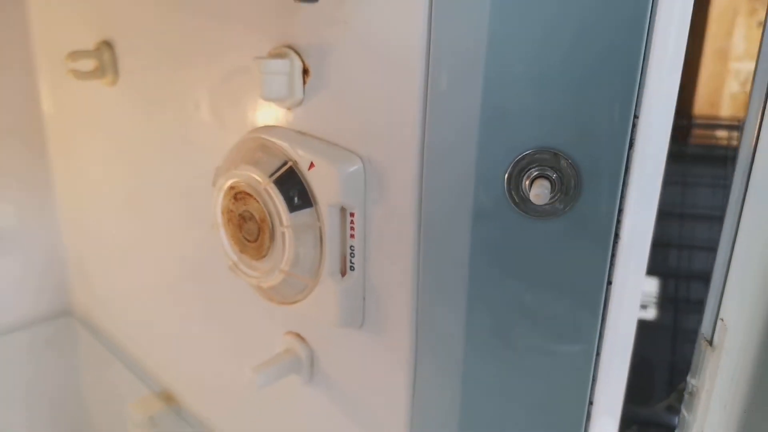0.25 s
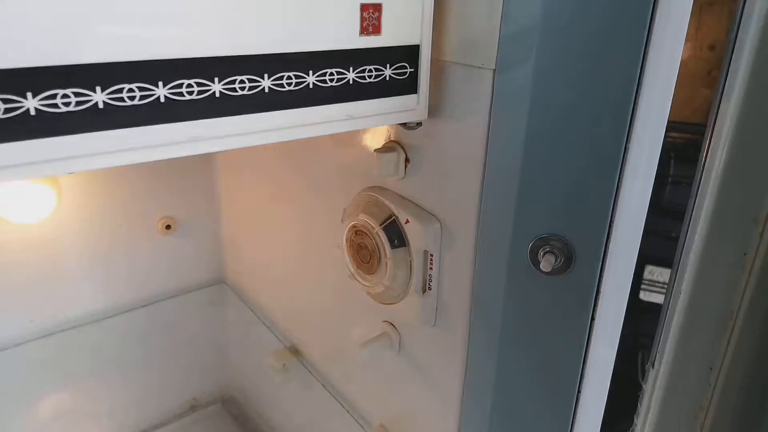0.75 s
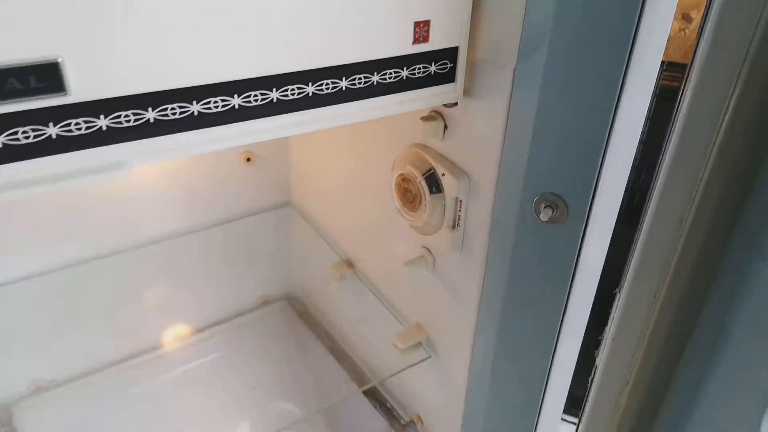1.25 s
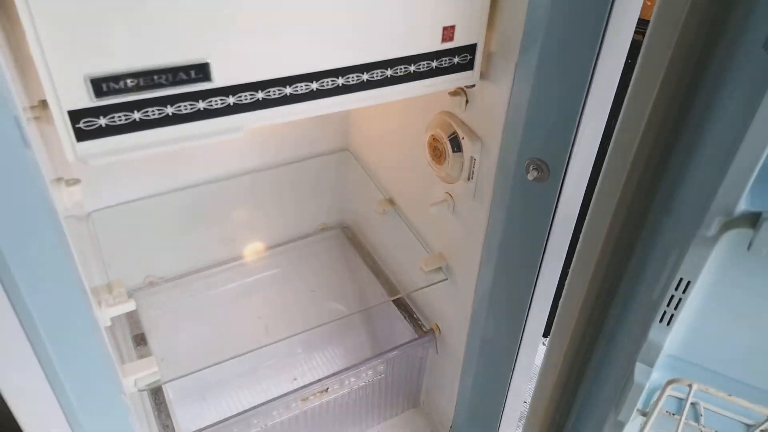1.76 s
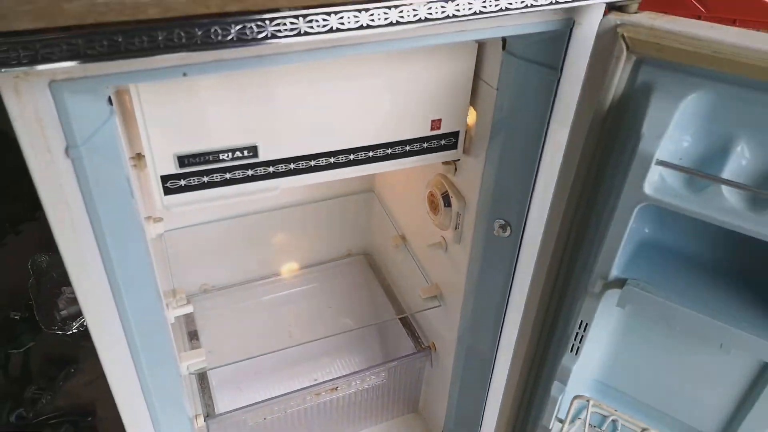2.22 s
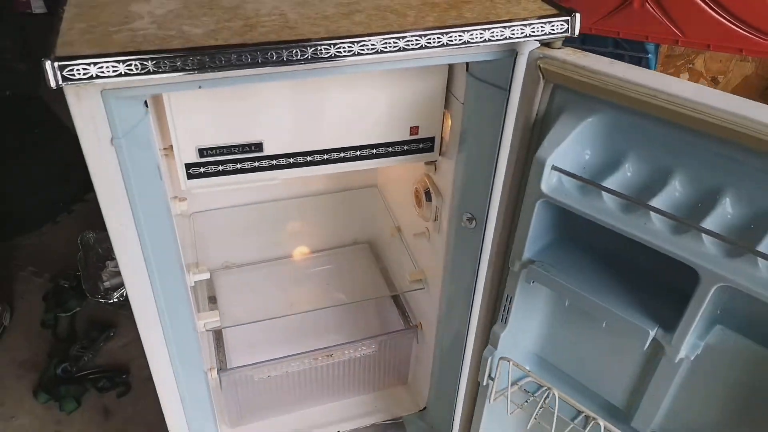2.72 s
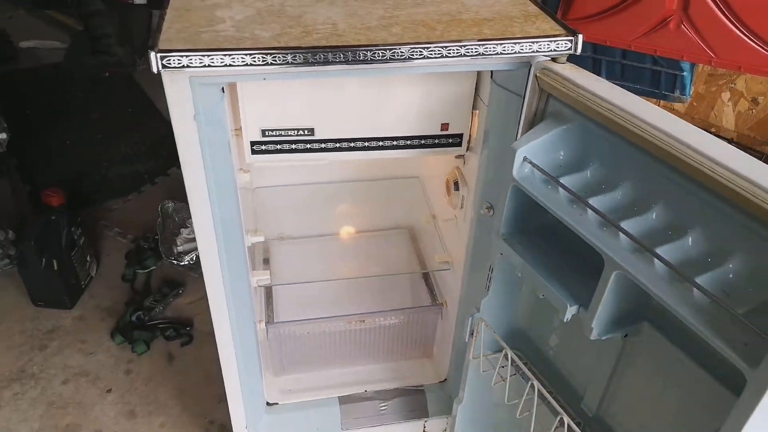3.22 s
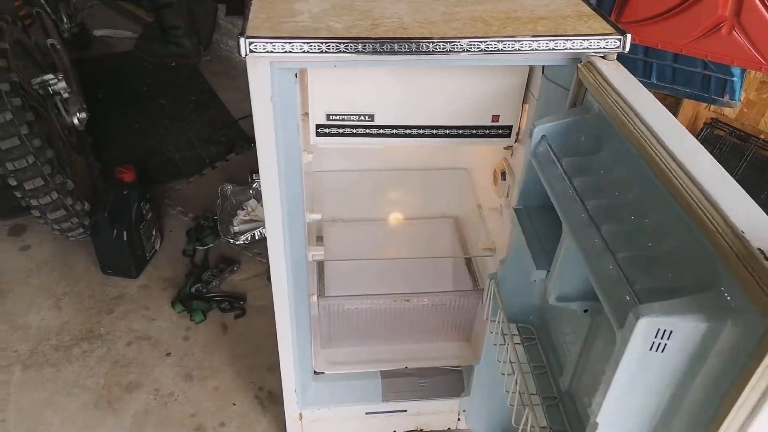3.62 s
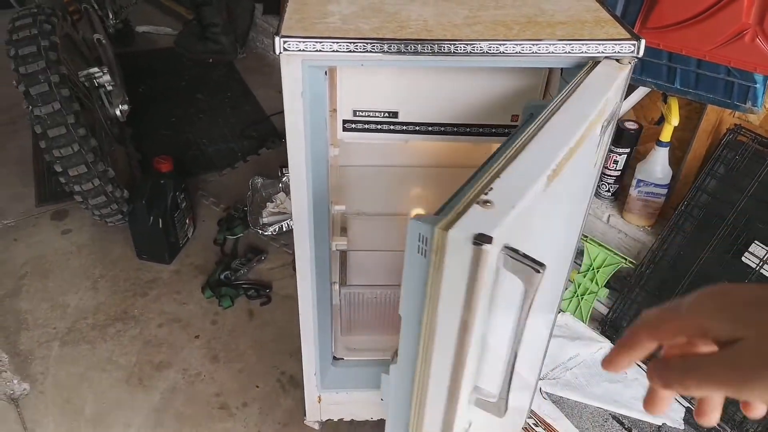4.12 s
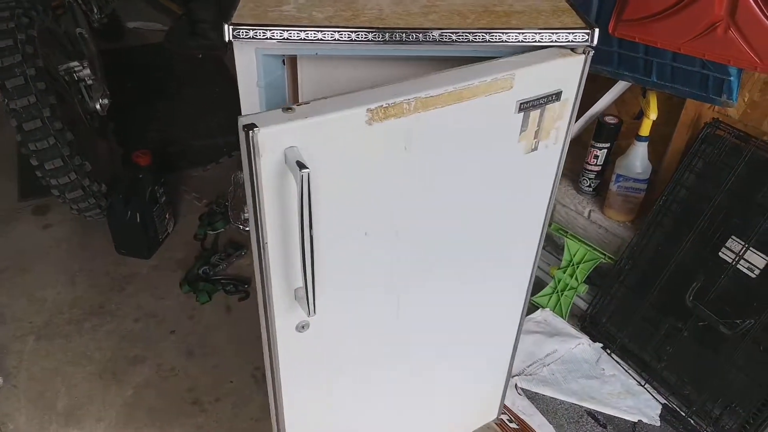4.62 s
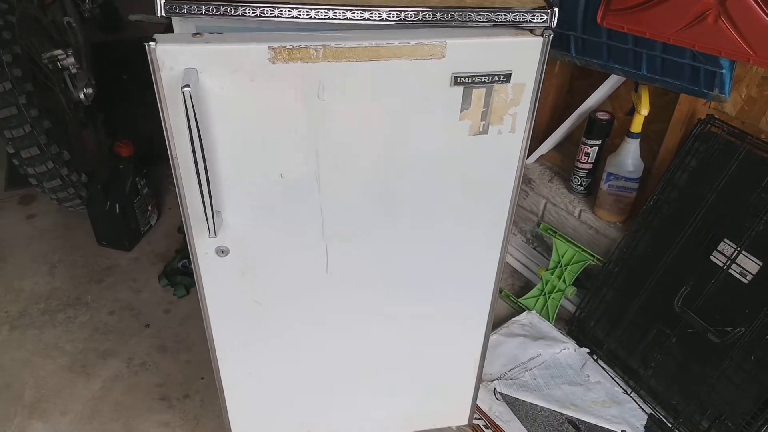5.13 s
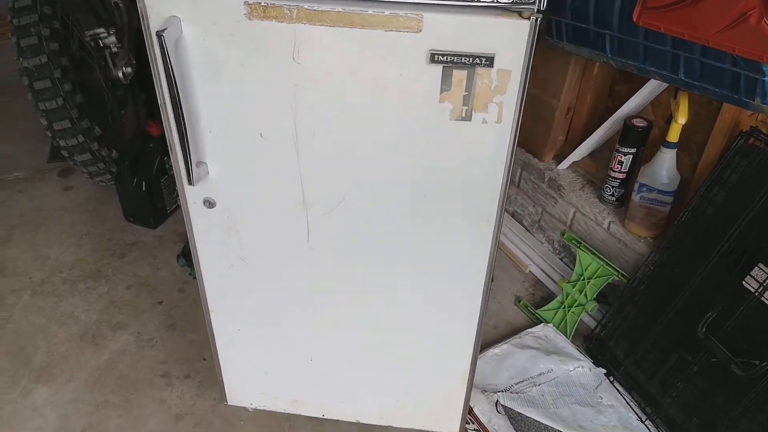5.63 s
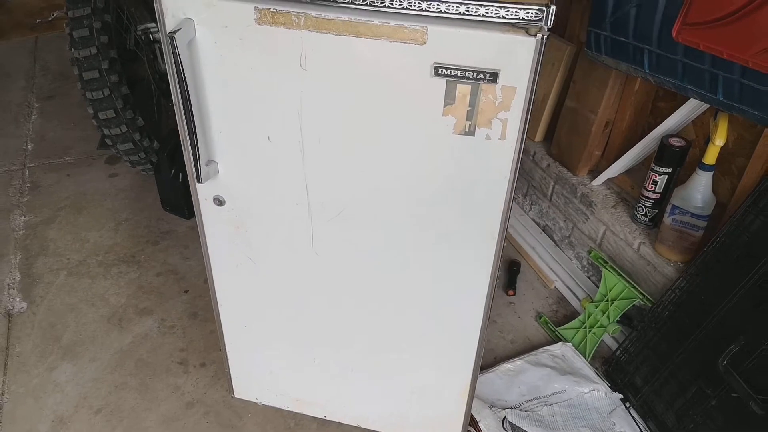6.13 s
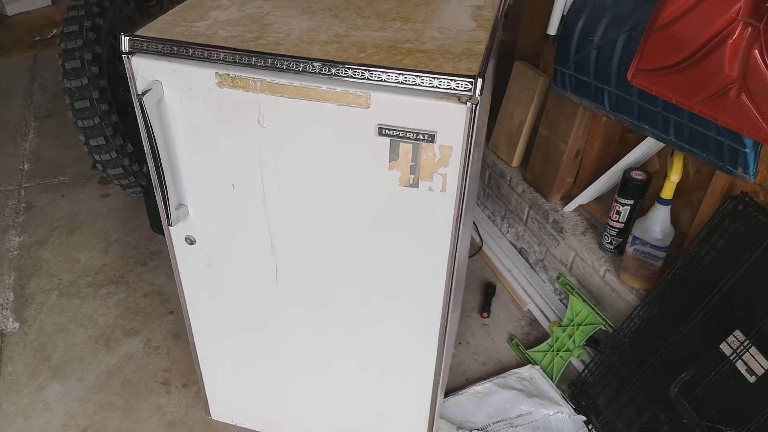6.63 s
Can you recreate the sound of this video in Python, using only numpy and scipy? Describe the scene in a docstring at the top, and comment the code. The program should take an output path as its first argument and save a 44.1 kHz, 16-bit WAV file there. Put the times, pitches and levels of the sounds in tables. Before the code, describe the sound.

In a quiet, cluttered garage, a handheld stereo microphone picks up a low grip rumble that dies away, soft clothing swishes, small bright clicks and gritty soles scraping concrete. The strongest scuff comes a little after two seconds. Around five and a half seconds an old refrigerator door lands with a hollow, uneven thump and gasket slap, then light shuffling and a sharp tick follow.

```python
"""A low grip rumble opens and dies away under a swish of cloth and small ticks in a quiet garage.
Soles scuff concrete: gritty noise rings sole resonances. Light taps are short pitched knocks with a
noisy rattle; ticks are short filtered bursts. At 5.5 s an old refrigerator's door thumps shut: soft pushes
ring the cabinet modes, noise bursts give the liner's shudder and the gasket's slap. Faint air, drone,
hiss and whine stay throughout. Two small microphones with a bright port resonance hear it."""
import sys
import numpy as np
from scipy import signal
from scipy.fft import rfft, irfft, next_fast_len
from scipy.io import wavfile

SR = 44100
rng = np.random.default_rng(int(sys.argv[2]) if len(sys.argv) > 2 else 0)


def bounce(signal):
    """Save signal as a 16-bit WAV file at the path given by the first command-line argument."""
    frames = np.transpose(np.atleast_2d(signal))
    limited = np.clip(frames, -1, 1)
    pcm = np.round(limited * 32767).astype(np.int16)
    wavfile.write(sys.argv[1], SR, pcm)


N = 302526
T = np.arange(N) / SR


def undb(db):
    """Decibels to gain."""
    return 10 ** (np.asarray(db) / 20)


def unit(x):
    """Scale to rms 1."""
    return x / np.sqrt(np.mean(x ** 2))


def fade(age_s, t60_s):
    """Silent before age 0, then an exponential decay of 60 dB per t60."""
    return (age_s >= 0) * undb(-60 * np.maximum(age_s, 0) / t60_s)


def bump(middle_s, half_s):
    """Gaussian swell, down to 1/e at half_s either side of the middle."""
    return np.exp(-((T - middle_s) / half_s) ** 2)


def spectral(x, response):
    """Filter by a response given as a function of frequency."""
    size = next_fast_len(x.shape[-1] + 4096)
    hz = np.maximum(np.fft.rfftfreq(size, 1 / SR), 1)
    return irfft(rfft(x, size) * response(hz), size)[..., :x.shape[-1]]


def colour(x, points):
    """Filter by (Hz, dB) points, joined over log frequency."""
    hz, db = np.transpose(points)
    return spectral(x, lambda f: undb(np.interp(np.log(f), np.log(hz), db)))


def resonance(f, hz, width_hz):
    """Band-pass response of one damped resonator."""
    return 1j * f * width_hz / (hz ** 2 - f ** 2 + 1j * f * width_hz)


def high_pass(f, hz):
    """Response that falls 12 dB an octave below hz."""
    return -f ** 2 / (hz ** 2 - f ** 2 + 1j * f * hz)


def diffuse(size=N, spacing_s=0.00041):
    """Noise from all sides at two ports: alike in the bass, unrelated in the treble."""
    length = next_fast_len(size)
    likeness = 0.97 * np.sinc(2 * np.fft.rfftfreq(length, 1 / SR) * spacing_s)
    spectra = rfft(rng.standard_normal((2, length))) * np.sqrt([1 + likeness, 1 - likeness])
    mid, side = irfft(spectra, length)[:, :size]
    return unit(np.array([mid + side, mid - side]))


def flicker(rate_hz, spread_db, size=N):
    """A random gain of rms 1 that takes a new value rate_hz times a second."""
    steps = rng.standard_normal(size // 4)
    return unit(undb(spread_db * np.interp(T[:size] * rate_hz, np.arange(len(steps)), steps)))


def nearby(x, echo_db, longest_s=0.007, count=6):
    """Floor and cabinet return a few early echoes that comb the sound, differently at each call."""
    lags_s = rng.uniform(0, longest_s, (2, count, 1))
    signs = rng.choice([-1, 1], (2, count, 1))
    gain = undb(echo_db)
    comb = lambda f: 1 + gain * np.sum(signs * np.exp(-2j * np.pi * f * lags_s), axis=1)
    return spectral(x, comb) / np.sqrt(1 + count * gain ** 2)


# Soles sliding on concrete. Each row: start in seconds, swell in seconds, hold in seconds, level in dB,
# sole resonance in Hz, its strength in dB, treble shelf in dB.
SOLE_SCUFFS = [ (0.487, 0.15, 0.087, -41.5, 467, 3, 17), (0.749, 0.0047, 0.0049, -29, 410, -1, 2.5),
               (0.799, 0.015, 0.1, -37, 533, 6.5, 11.5), (0.95, 0.012, 0.012, -52, 490, 18, 15),
               (1.204, 0.043, 0.007, -44.5, 800, 8.5, 21.5), (1.364, 0.0083, 0.015, -31.5, 610, 11.5, 15),
               (2.004, 0.052, 0.0092, -48, 900, -12, 17), (2.049, 0.068, 0.04, -28, 910, 3, 11.5),
               (2.2805, 0.0032, 0.066, -22, 856, -8.5, 4.5), (2.914, 0.063, 0.045, -37.5, 680, 5.5, 5.5),
               (3.259, 0.05, 0.043, -32.5, 570, 5.5, 10.5), (4.296, 0.059, 0.073, -39.5, 636, 2.5, 2.5),
               (4.955, 0.11, 0.03, -44, 885, -14, -3.5), (5.398, 0.033, 0.043, -52, 1000, -15, 8),
               (5.476, 0.048, 0.013, -45, 950, -9, 17), (5.854, 0.036, 0.008, -41, 805, -8, 12.5),
               (5.915, 0.02, 0.026, -47, 750, 3.5, 1), (5.987, 0.017, 0.025, -46.5, 610, 7.5, 9),
               (6.575, 0.0036, 0.04, -42, 660, 1.5, 12.5), (6.808, 0.009, 0.053, -54, 1000, -7, 17), ]
# Grit under a sole. Each row: frequency in Hz, relative level in dB.
GRIT_SPECTRUM = [(100, 8), (500, 0), (1300, -1), (2000, 0), (2700, 0), (3800, 2), (5500, 2), (8000, 2),
                 (11500, 2), (15000, -0.5)]
TOUCH_S, TOUCH_SHARE, LIFT_T60_S = 0.0039, 0.17, 0.13  # share of full load at touchdown
OVERTONE_RATIO = 2.8  # second sole resonance over the first


def soles(grain_db=2.0, slip_db=1.5, catch_db=5.5, shelf_hz=7500, edge_ratio=0.97, body_width_ratio=0.96,
          overtone_db=-9.5, overtone_width_ratio=0.5, pops_per_s=160, pop_db=14, echo_db=-7, ease=1.7):
    """Dense grit catches and slips under each step and rings the sole; coarser grains pop all through it."""
    pops = undb(pop_db) * (rng.random(N) < pops_per_s / SR) * rng.standard_normal((2, N))
    grit = unit(colour(diffuse() + pops, GRIT_SPECTRUM))
    grit = grit * flicker(2500, grain_db) * flicker(70, slip_db)
    low_catches, high_catches = flicker(220, catch_db), flicker(130, catch_db)
    out = np.zeros((2, N))
    for start_s, swell_s, hold_s, level_db, sole_hz, body_db, treble_db in SOLE_SCUFFS:
        end_s = start_s + swell_s + hold_s + 2 * LIFT_T60_S
        span = slice(int(start_s * SR), int(end_s * SR))
        age_s = T[span] - start_s
        # touch down, then take the load gradually
        load = TOUCH_SHARE + (1 - TOUCH_SHARE) * np.clip(age_s / swell_s, 0, 1) ** ease
        weight = np.clip(age_s / TOUCH_S, 0, 1) * load
        lift = fade(np.maximum(age_s - swell_s - hold_s, 0), LIFT_T60_S)
        rub = grit[:, span] * weight * lift
        # a small sole radiates little below its resonance
        edge_hz, overtone_hz = edge_ratio * sole_hz, OVERTONE_RATIO * sole_hz
        shelf = lambda f: undb(treble_db * f ** 2 / (f ** 2 + shelf_hz ** 2))
        body_ring = lambda f: high_pass(f, edge_hz) * resonance(f, sole_hz, body_width_ratio * sole_hz)
        overtone_ring = lambda f: resonance(f, overtone_hz, overtone_width_ratio * overtone_hz)
        hiss = spectral(rub, lambda f: high_pass(f, edge_hz) * shelf(f))
        # separate catches shift the colour within a step
        body = spectral(rub * low_catches[span], body_ring)
        overtone = spectral(rub * high_catches[span], overtone_ring)
        scuff = undb(level_db) * (hiss + undb(body_db) * (body + undb(overtone_db) * overtone))
        # early echoes crossfade as the foot travels
        travel = np.clip((age_s - swell_s / 2) / (swell_s + hold_s), 0, 1)
        out[:, span] += nearby(scuff * (1 - travel), echo_db) + nearby(scuff * travel, echo_db)
    return out


# The door meets the frame edge by edge. Each row: start in seconds, push in dB, contact time in seconds,
# gasket slap in dB.
DOOR_CONTACTS = [(5.531, -3, 0.0034, 1.5), (5.536, -1, 0.0013, 3.5), (5.546, 3, 0.0071, -4),
                 (5.56, 2.5, 0.00306, -4), (5.5763, 0.5, 0.009, -4.5)]
# Ring of door and cabinet. Each row: frequency in Hz, level in dB, t60 in seconds.
CABINET_MODES = [(35, -40, .29), (67.5, -29, 0.26), (86.5, -24, 0.05), (111.6, -34.5, 0.56),
                 (164.7, -48, 0.66), (183, -50, .4), (232, -37, 0.3), (250.5, -36, 0.35), (277, -33, 0.14),
                 (319, -30.5, 0.12), (335.7, -22.5, 0.3), (470, -24, 0.08), (667, -33, 0.17),
                 (840, -16, 0.037), (904, -25.5, 0.21)]
# Crowded modes of liner, shelves and bins. Each row: frequency in Hz, relative level in dB.
LINER_SPECTRUM = [(60, -3), (150, -0.5), (270, 0.5), (430, -8.5), (600, -14.5), (880, -14.5), (1250, -17.5),
                  (3000, -21.5), (8000, -25), (15000, -41)]
# Gasket on painted steel, slapping or brushing. Each row: frequency in Hz, relative level in dB.
GASKET_SPECTRUM = [(300, 9), (1500, -2.5), (3000, -2.5), (5500, -3.5), (8000, -3.5), (10500, 0.5),
                   (15000, 1)]


def door(liner_db=-34.0, liner_t60_s=0.33, slap_db=-22, slap_t60_s=0.089, rattle_db=3):
    """Soft pushes ring the cabinet; the liner shudders and the gasket slaps at each contact."""
    t, first = T[:SR], int(DOOR_CONTACTS[0][0] * SR)
    ring = sum(undb(db) * np.sin(2 * np.pi * hz * t) * fade(t, t60_s) for hz, db, t60_s in CABINET_MODES)
    force, shudder_power, slap_power = np.zeros((3, SR))
    for start_s, push_db, contact_s, gasket_db in DOOR_CONTACTS:
        age_s = t + first / SR - start_s
        squeeze = np.clip(age_s / contact_s, 0, 1)
        push = np.sin(np.pi * squeeze) ** 2
        force += undb(push_db) * push / push.sum()
        # separate contacts add in power
        shudder_power += (undb(push_db) * squeeze * fade(age_s, liner_t60_s)) ** 2
        slap_power += (undb(gasket_db) * squeeze * fade(age_s, slap_t60_s)) ** 2
    boom = signal.fftconvolve(force, ring)[:SR]
    liner = undb(liner_db) * np.sqrt(shudder_power) * unit(colour(diffuse(size=SR), LINER_SPECTRUM))
    gasket = undb(slap_db) * np.sqrt(slap_power) * unit(colour(diffuse(size=SR), GASKET_SPECTRUM))
    gasket = gasket * flicker(855, rattle_db, size=SR)
    return np.pad(boom + liner + nearby(gasket, echo_db=-9.5), ((0, 0), (first, N - first - SR)))


def gasket_brush(middle_s=5.522, half_s=0.015, level_db=-42, stick_db=3):
    """The hinge side of the gasket brushes the frame just before the door lands."""
    rub = unit(colour(diffuse(), GASKET_SPECTRUM)) * flicker(600, stick_db)
    return undb(level_db) * rub * bump(middle_s, half_s)


# Cloth sliding on cloth. Each row: middle in seconds, half length to 1/e in seconds, level in dB.
CLOTH_SWISHES = [(0.179, 0.15, -44.5), (0.726, 0.36, -44.5), (1.542, 0.3, -48), (2.607, 0.06, -52),
                 (3.442, 0.15, -56), (4.309, 0.097, -46), (4.547, 0.24, -51), (5.917, 0.065, -43.5),
                 (6.69, 0.28, -46.5)]
# Woven cloth. Each row: frequency in Hz, relative level in dB.
CLOTH_SPECTRUM = [(200, -4.5), (1500, -17.5), (2800, -14), (4500, -15), (8000, -8.5), (11000, -4),
                  (15000, -3.5)]


def clothes(fibre_db=2.5):
    """Fibres flick over each other as the arms move."""
    speed = sum(undb(db) * bump(middle_s, half_s) for middle_s, half_s, db in CLOTH_SWISHES)
    return unit(colour(diffuse(), CLOTH_SPECTRUM)) * speed * flicker(1800, fibre_db)


# Small handling clicks. Each row: start in seconds, snap in dB, crackle in dB, pitch in Hz.
HANDLING_CLICKS = [(.175, -40, -38, 10000), (0.215, -30, -45, 9600), (.2948, -41, -39.5, 12400),
                   (0.302, -36.5, -52, 9400), (1.8788, -32.5, -51, 10200), (1.906, -33.5, -62, 9200),
                   (1.965, -39, -50, 11000), (1.969, -37, -49, 8600), (1.973, -37, -68, 9600),
                   (2.456, -52, -67, 12000), (2.8552, -41, -51, 12400), (2.876, -44, -50, 11500),
                   (2.896, -43, -53, 11000), (2.911, -43, -42, 11700), (3.7905, -36, -63, 11300),
                   (3.819, -44, -70, 9600), (3.8365, -40, -66, 11600), (4.891, -54, -41, 10200),
                   (4.896, -34, -37.5, 11200), (5.416, -47, -45, 11800), (5.854, -46, -42, 10100),
                   (6.0945, -31.5, -45.5, 13000), (6.125, -49, -65, 12000), (6.516, -37, -51, 12000)]
CLICK_WIDTH_HZ, CLICK_EDGE_HZ = 3400, 2440
SNAP_RISE_S, SNAP_T60_S, CRACKLE_T60_S = 0.0002, 0.0069, 0.13


def clicks(crackle_spread_db=0.5, left_over_right_db=4):
    """Each click is a snap and a short crackle of tiny slips through a bright resonance."""
    slips = diffuse() * flicker(3000, crackle_spread_db)
    pan = undb(np.array([[left_over_right_db], [-left_over_right_db]]) / 2)
    out = np.zeros((2, N))
    for start_s, snap_db, crackle_db, hz in HANDLING_CLICKS:
        first = int(start_s * SR)
        span = slice(first, first + 8192)
        age_s = T[span] - T[first]
        bright = lambda f: resonance(f, hz, CLICK_WIDTH_HZ) * high_pass(f, CLICK_EDGE_HZ)
        tone = unit(spectral(slips[:, span], bright))
        rise = np.clip(age_s / SNAP_RISE_S, 0, 1)
        burst = rise * fade(np.abs(age_s - SNAP_RISE_S), SNAP_T60_S)
        # each port's snap carries the energy of the burst
        snap = np.array([unit(port * burst) for port in tone]) * np.sqrt(np.mean(burst ** 2))
        crackle = tone * rise * fade(age_s, CRACKLE_T60_S)
        out[:, span] += pan * undb(snap_db) * snap + undb(crackle_db) * crackle
    return out


def ping(start_s=6.0941, level_db=-19, port_hz=12080, ring_t60_s=0.014, rise_s=0.0006, right_db=-9):
    """A fingernail catches the rim of the left microphone's port and rings it once."""
    age_s = T - start_s
    envelope = np.clip(age_s / rise_s, 0, 1) * fade(np.abs(age_s - rise_s), ring_t60_s)
    ring = np.sin(2 * np.pi * port_hz * age_s) * envelope
    return undb(level_db) * np.array([ring, undb(right_db) * ring])


# Light taps and knocks. Each row: start in seconds, level in dB, pitch in Hz,
# pitched knock's strength in dB.
LIGHT_TAPS = [(0.375, -42, 1640, 2), (0.376, -44, 1090, 2), (3.519, -47, 840, 2), (3.837, -53.5, 2607, 4),
              (3.94, -63.5, 1140, 12.5), (4.158, -59, 1310, 8), (4.57, -52.5, 1250, 7),
              (4.888, -47, 1320, -14), (5.272, -43, 1180, -2), (5.278, -49, 322, -3),
              (5.302, -48, 1120, -5)]
RATTLE_CYCLES, RATTLE_WIDTH_RATIO = 145, 1.2  # cycles to -60 dB; filter width over pitch


def taps(right_over_left_db=3, knock_cycles=24, rattle_db=-5):
    """Each tap is a short pitched knock with a noisy rattle; the lower it is, the longer it lasts."""
    out = np.zeros((2, N))
    size = SR // 2
    t = T[:size]
    for start_s, level_db, hz, knock_db in LIGHT_TAPS:
        first = int(start_s * SR)
        knock = np.sin(2 * np.pi * hz * t) * fade(t, knock_cycles / hz)
        band = lambda f: resonance(f, hz, RATTLE_WIDTH_RATIO * hz) ** 2
        rattle = unit(spectral(diffuse(size=size), band)) * fade(t, RATTLE_CYCLES / hz)
        out[:, first:first + size] += undb(level_db) * (undb(knock_db) * knock + undb(rattle_db) * rattle)
    return out * undb(np.array([[-right_over_left_db], [right_over_left_db]]) / 2)


def finger(middle_s=0.54, half_s=0.17, level_db=-54, case_hz=1400, case_width_hz=1100):
    """A finger slides softly along the phone's case: noise through two passes of one resonance."""
    rub = unit(spectral(diffuse(), lambda f: resonance(f, case_hz, case_width_hz) ** 2))
    return undb(level_db) * rub * bump(middle_s, half_s)


def garage(x, wet_db, t60_s=0.29, first_echo_s=0.0071):
    """Cluttered walls return a short, dense tail."""
    tail = diffuse(size=SR // 2) * fade(T[:SR // 2] - first_echo_s, t60_s)
    tail /= np.sqrt(np.sum(tail ** 2) / 2)
    return x + undb(wet_db) * signal.oaconvolve(x, tail, axes=1)[:, :N]


# Still air of the garage. Each row: frequency in Hz, relative level in dB.
AIR_SPECTRUM = [(15, -7.5), (35, 5.5), (48, -6.5), (64, 3.5), (85, -5.5), (110, -2.5), (160, -11.5),
                (300, -13), (500, -17.5), (850, -17.5), (1500, -25.5), (4000, -36), (15000, -31.5)]


def background(air_db=-53.0, drone_db=-60, drone_hz=65, drone_width_hz=6,
               grip_db=-49, grip_hz=98, grip_width_hz=26, grip_t60_s=3.1):
    """Low outdoor rumble with a faint drone; the hand's grip on the phone rumbles first and dies away."""
    air = unit(colour(diffuse(), AIR_SPECTRUM)) * flicker(2.15, 0.45)
    rumble = diffuse()
    drone = unit(spectral(rumble, lambda f: resonance(f, drone_hz, drone_width_hz) ** 2))
    grip = unit(spectral(rumble, lambda f: resonance(f, grip_hz, grip_width_hz) ** 2))
    grip = grip * fade(T, grip_t60_s)
    return undb(air_db) * air + undb(drone_db) * drone + undb(grip_db) * grip


def scene():
    """Steps, cloth, clicks, taps and the door in one small room."""
    person = garage(soles() + clothes(), wet_db=-5.5, t60_s=0.33)
    shutting = garage(door() + gasket_brush(), wet_db=-18, t60_s=0.63)
    handling = garage(clicks() + taps() + finger(), wet_db=-12.0) + ping()
    return person + shutting + handling + background()


# Port response of each microphone. Each row: frequency in Hz, gain in dB.
LEFT_PORT_RESPONSE = [(100, -1.5), (8000, -.5), (10000, 3), (11700, 10), (12800, 5), (14000, 3),
                      (15200, -3)]
RIGHT_PORT_RESPONSE = [(100, -1), (8000, -2), (10400, 4), (11700, -1), (12800, -8), (14000, -9),
                       (15200, -11)]
# The microphones' own hiss. Each row: frequency in Hz, relative level in dB.
HISS_SPECTRUM = [(100, -13), (4000, -27.5), (8000, -17), (11000, -2.5), (13500, -2.5), (15000, -8.5)]
TOP_HZ = 15150


def record(dry, hiss_db=-61, whine_db=-59, whine_hz=11999, whine_right_db=-15, low_cut_hz=28):
    """Cut the deepest bass, colour by the ports, add electronic hiss and a thin whine, cut the top."""
    thin = signal.sosfilt(signal.butter(2, low_cut_hz, "high", fs=SR, output="sos"), dry)
    heard = np.array([colour(thin[0], LEFT_PORT_RESPONSE), colour(thin[1], RIGHT_PORT_RESPONSE)])
    hiss = undb(hiss_db) * unit(colour(rng.standard_normal((2, N)), HISS_SPECTRUM))
    whine = undb(whine_db) * np.sin(2 * np.pi * whine_hz * T) * flicker(40, 0.49)
    electronics = hiss + np.array([whine, undb(whine_right_db) * whine])
    top_cut = signal.ellip(10, 0.2, 70, TOP_HZ, fs=SR, output="sos")
    return signal.sosfilt(top_cut, heard + electronics)


dry = scene()
out = record(dry)
bounce(out)
```